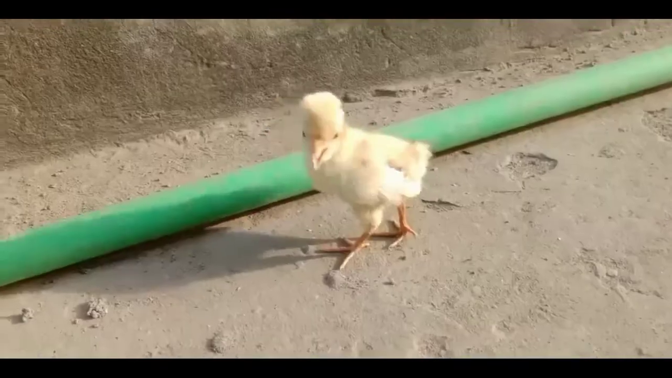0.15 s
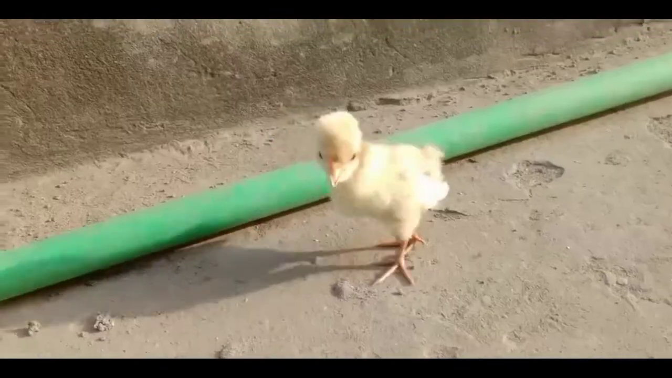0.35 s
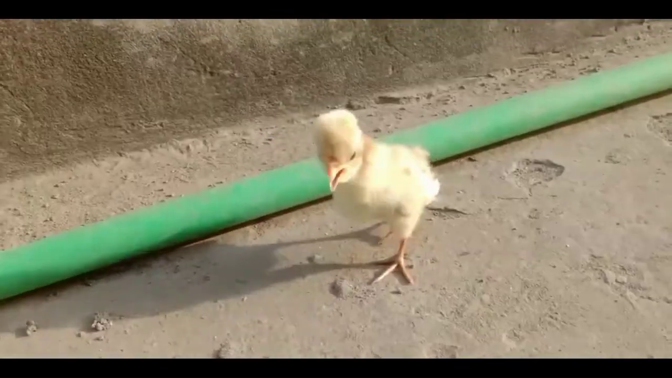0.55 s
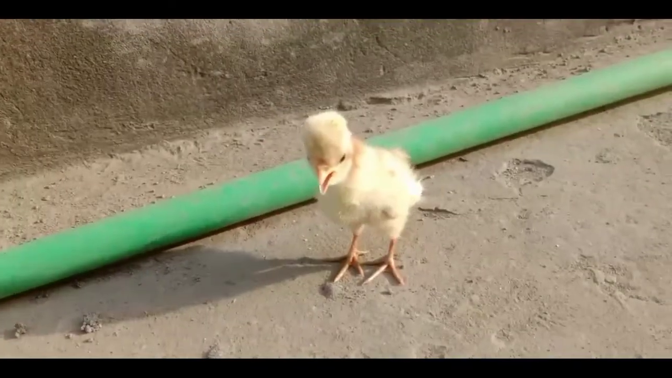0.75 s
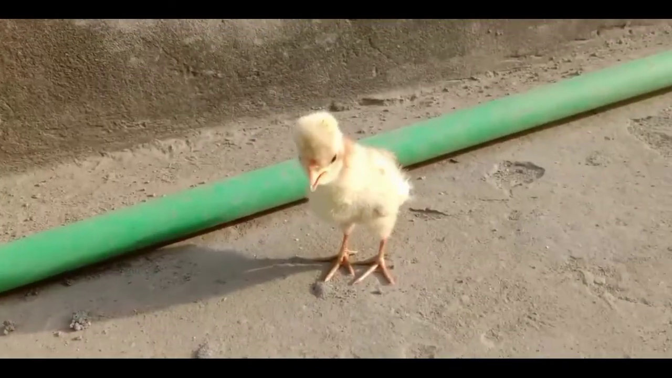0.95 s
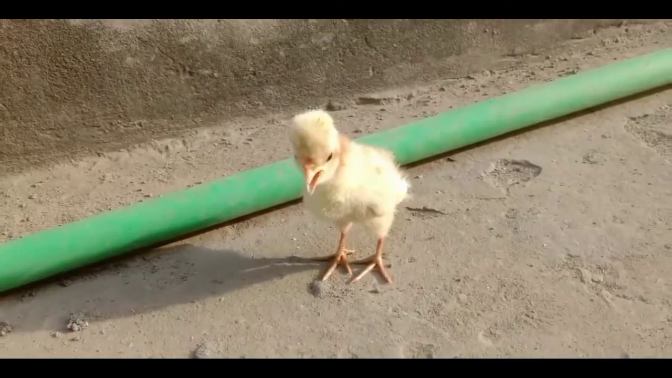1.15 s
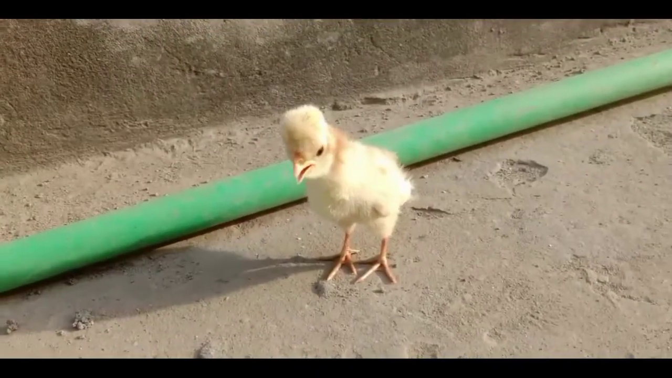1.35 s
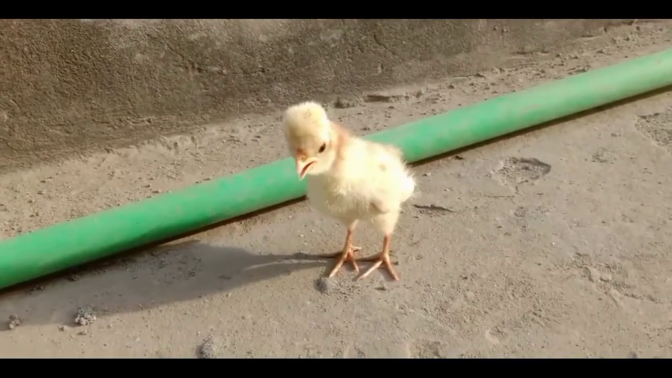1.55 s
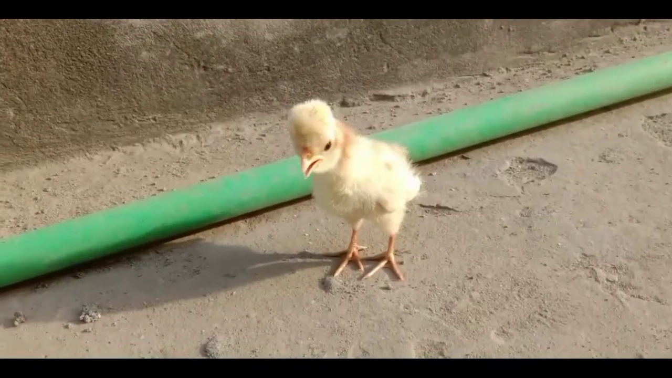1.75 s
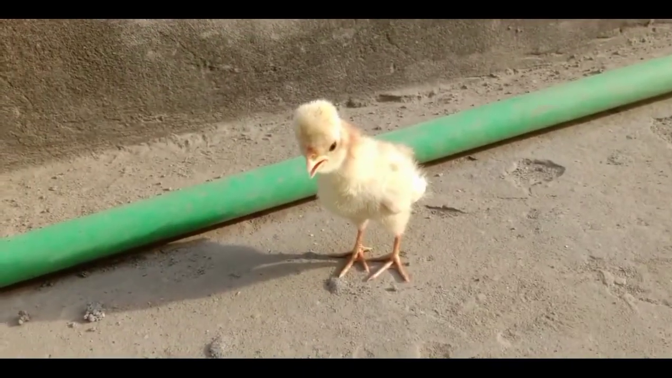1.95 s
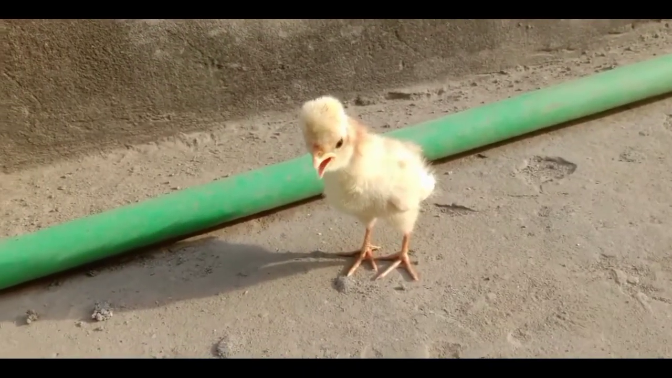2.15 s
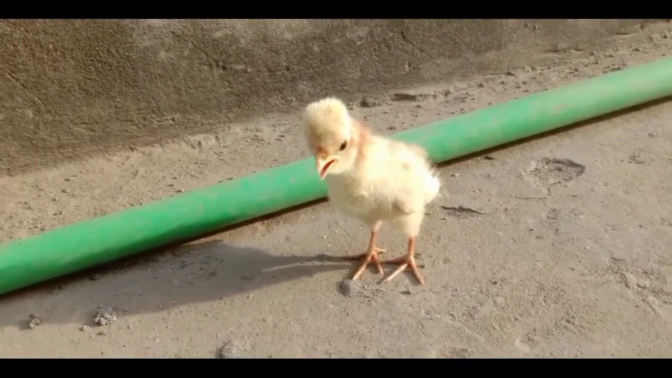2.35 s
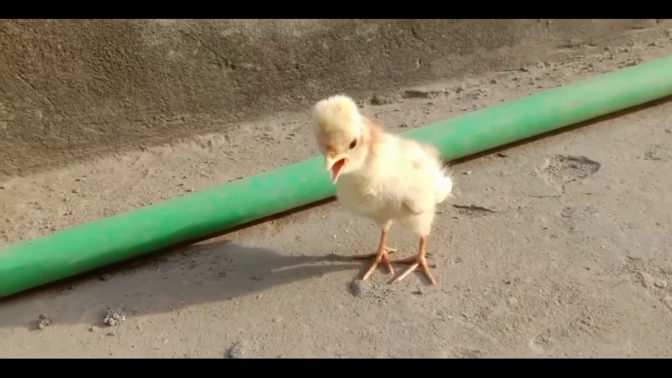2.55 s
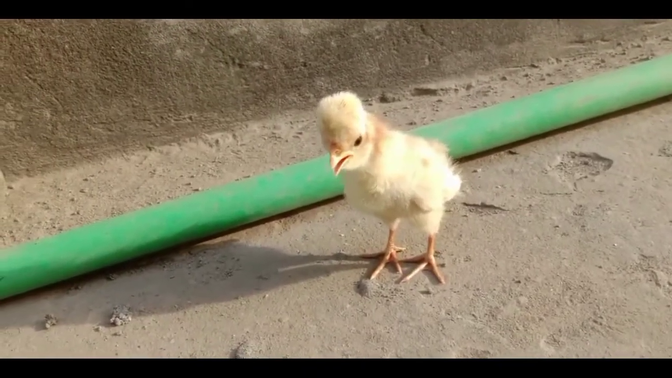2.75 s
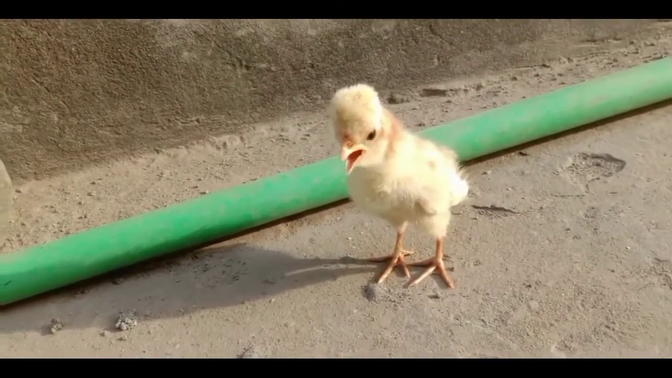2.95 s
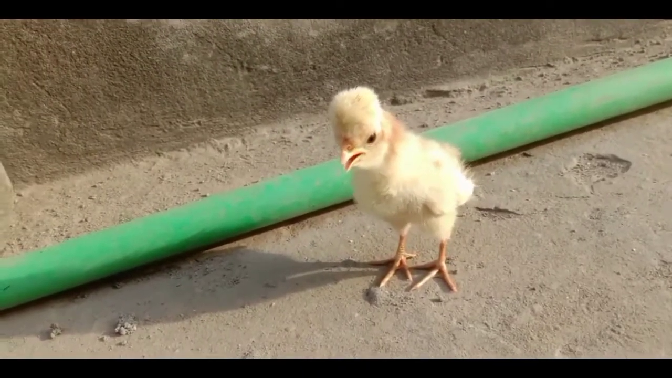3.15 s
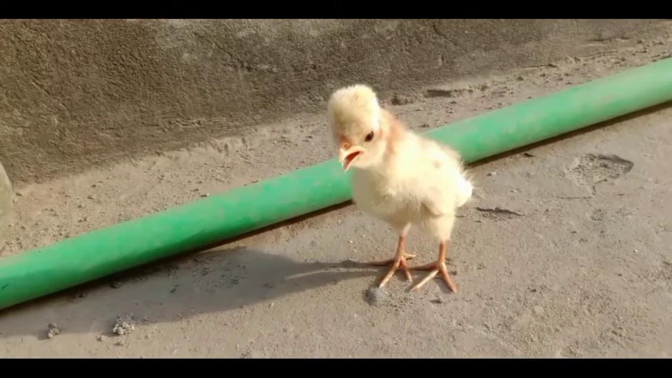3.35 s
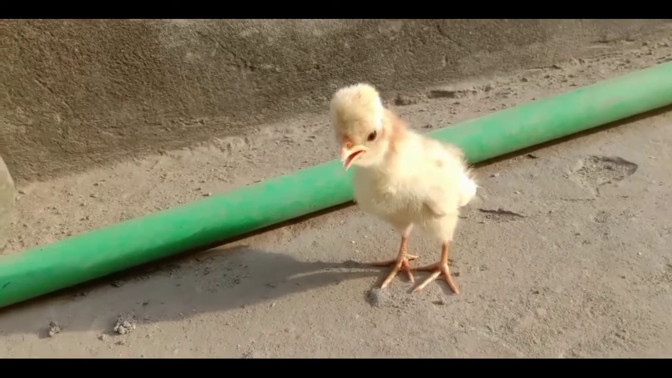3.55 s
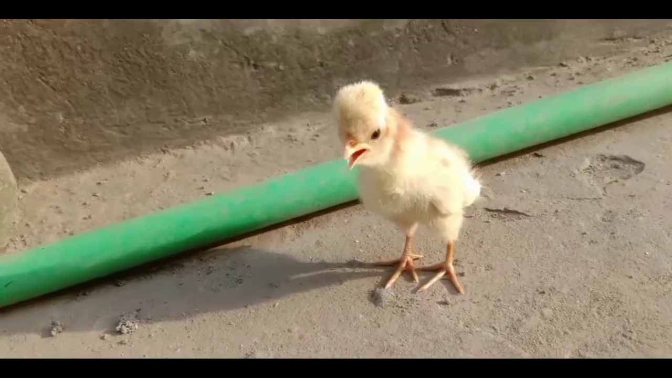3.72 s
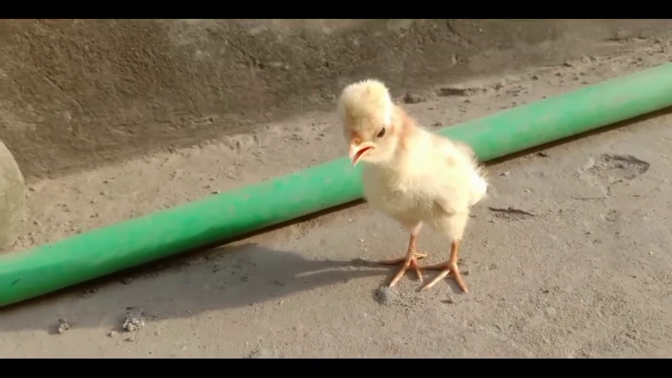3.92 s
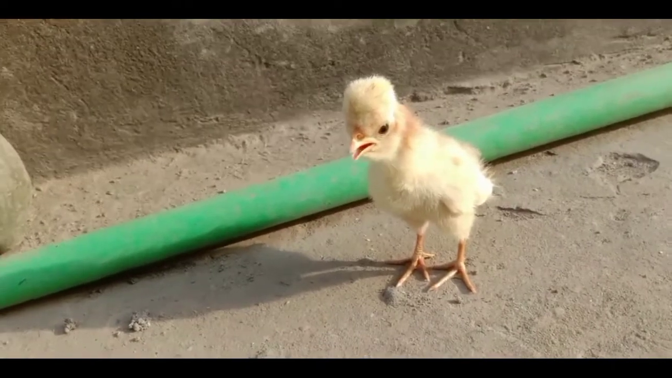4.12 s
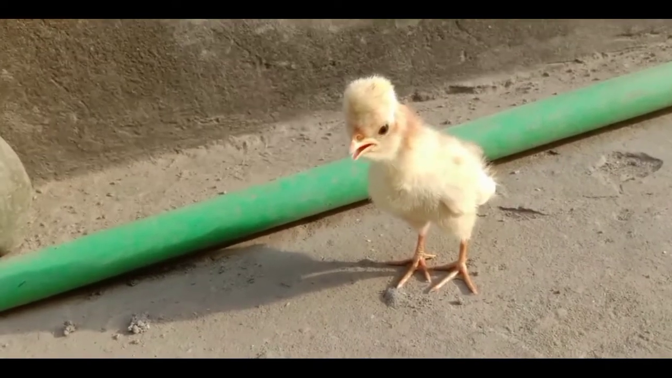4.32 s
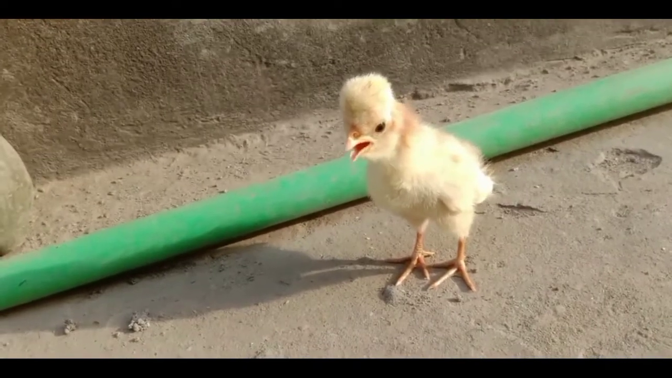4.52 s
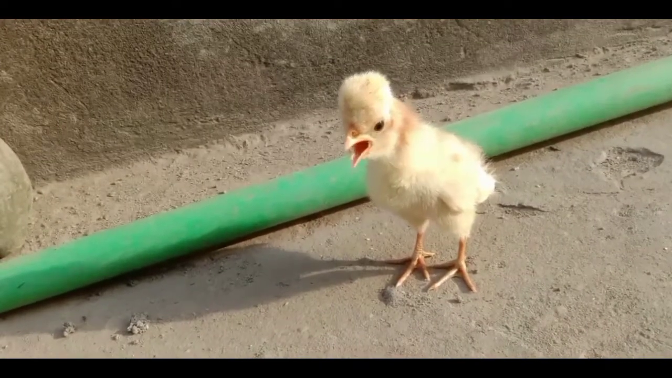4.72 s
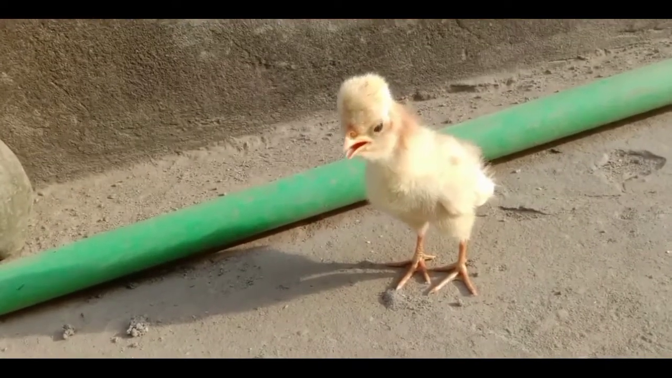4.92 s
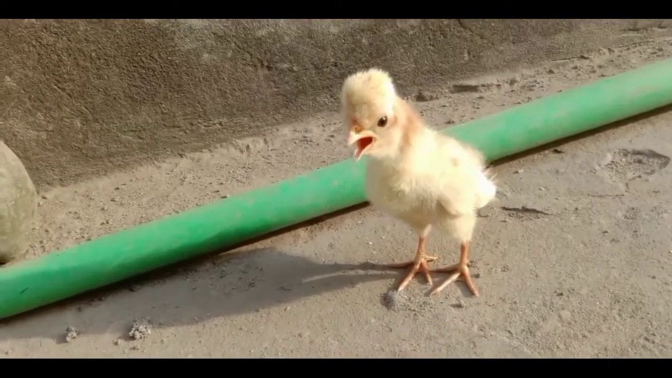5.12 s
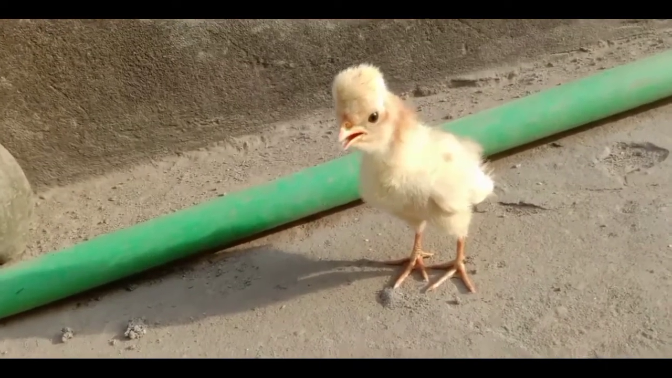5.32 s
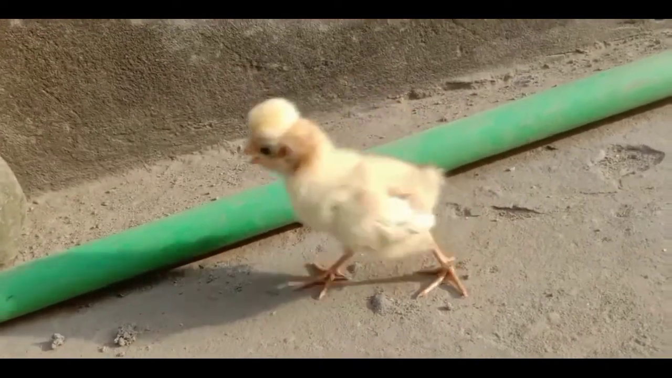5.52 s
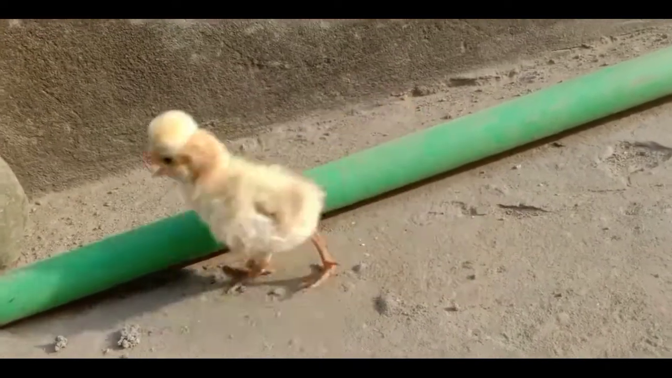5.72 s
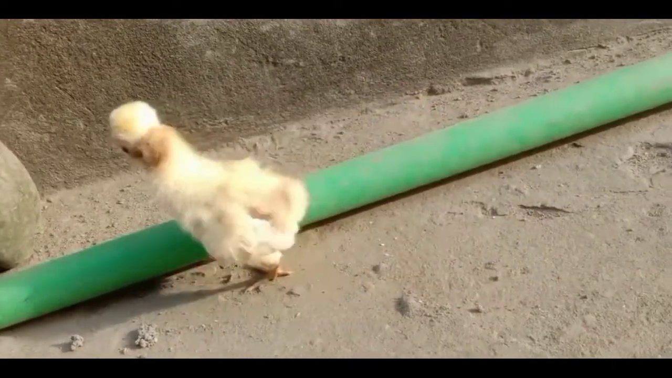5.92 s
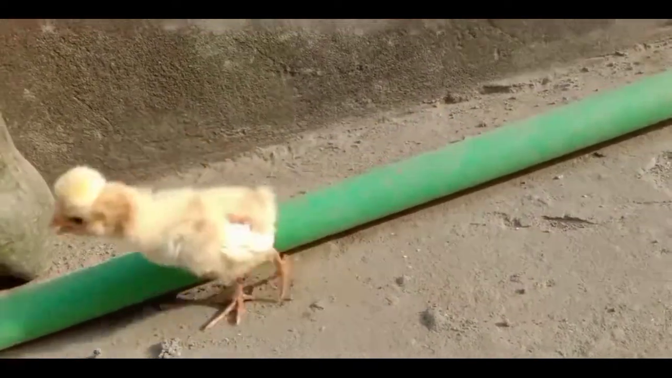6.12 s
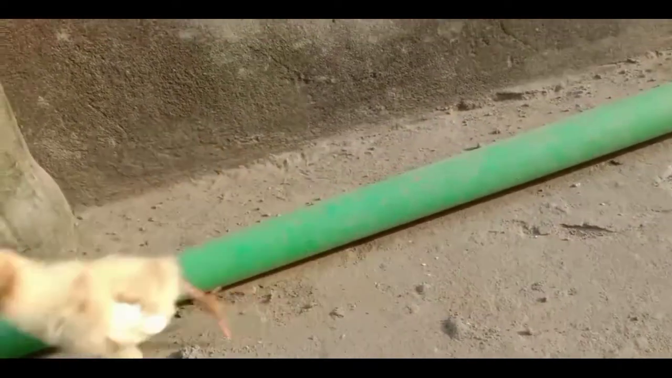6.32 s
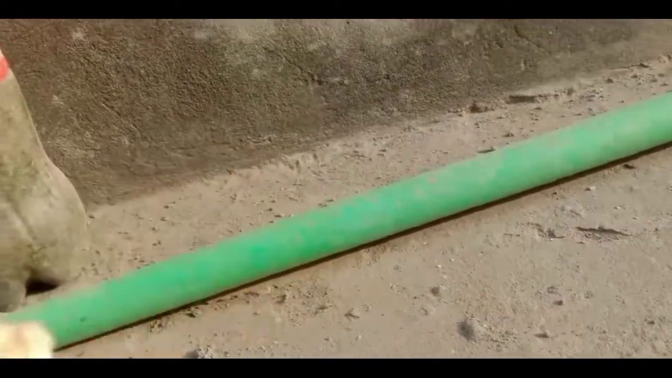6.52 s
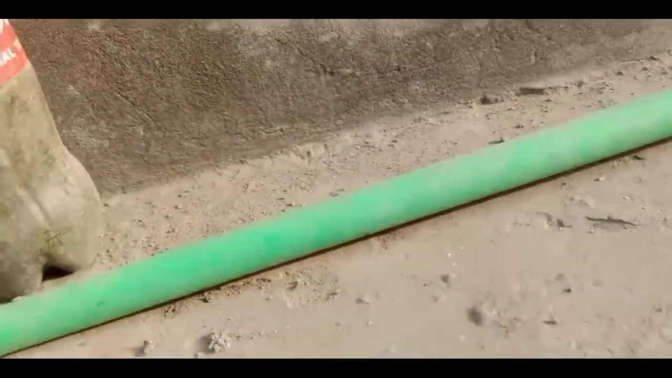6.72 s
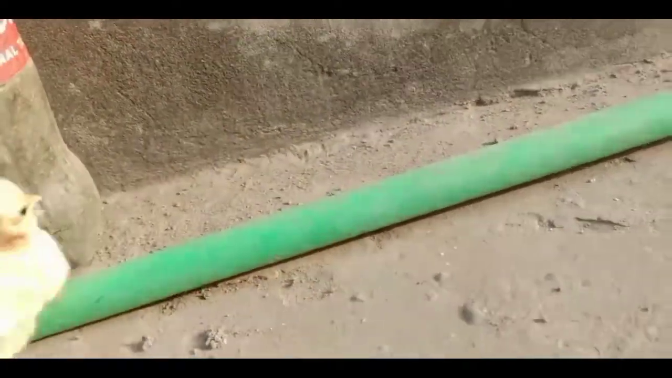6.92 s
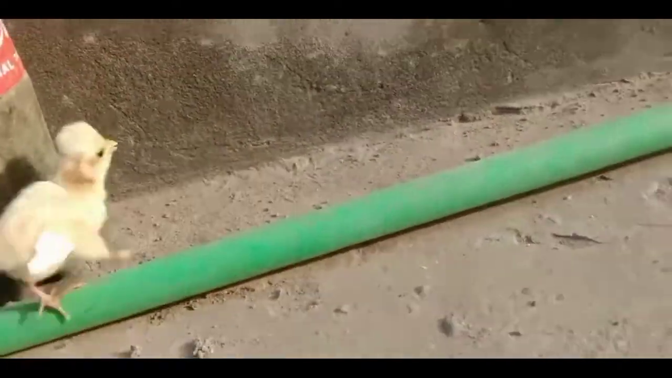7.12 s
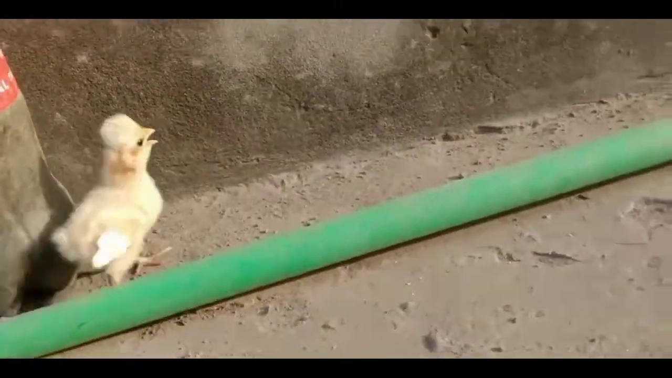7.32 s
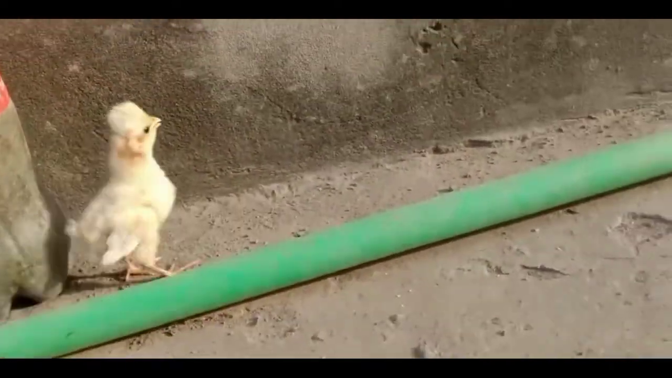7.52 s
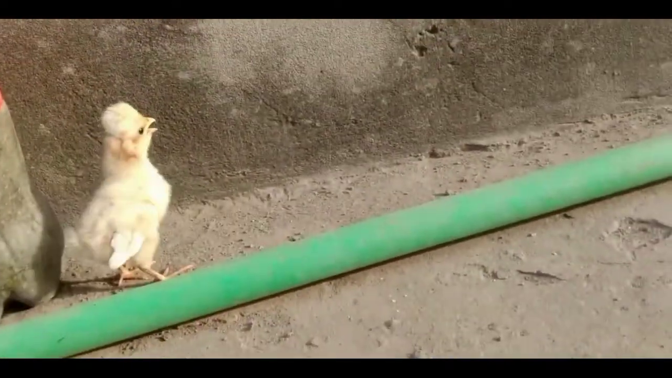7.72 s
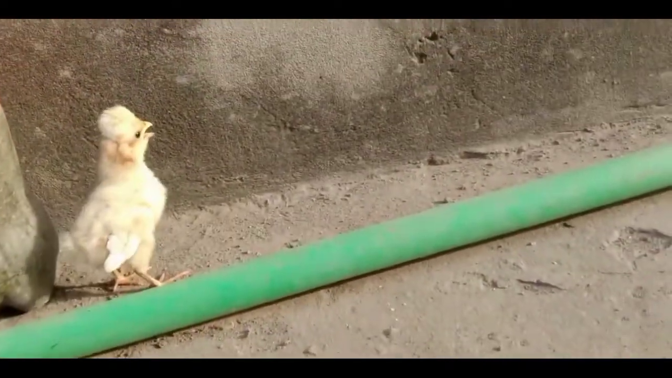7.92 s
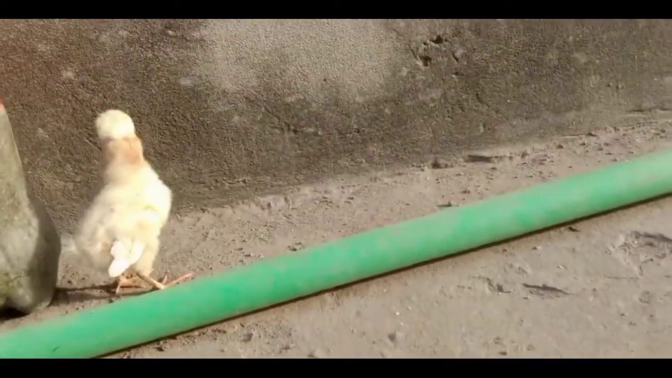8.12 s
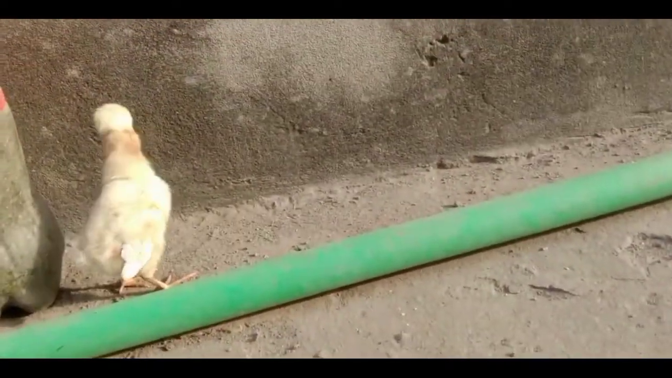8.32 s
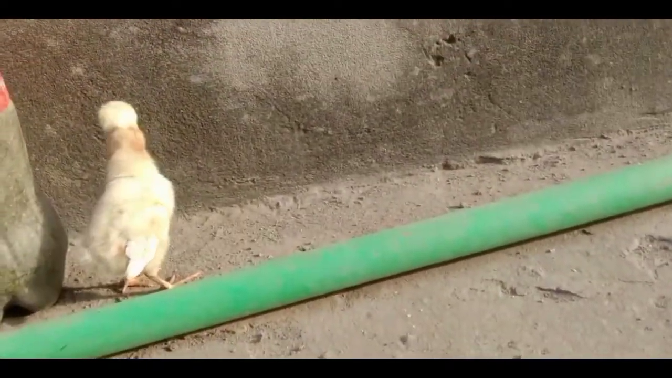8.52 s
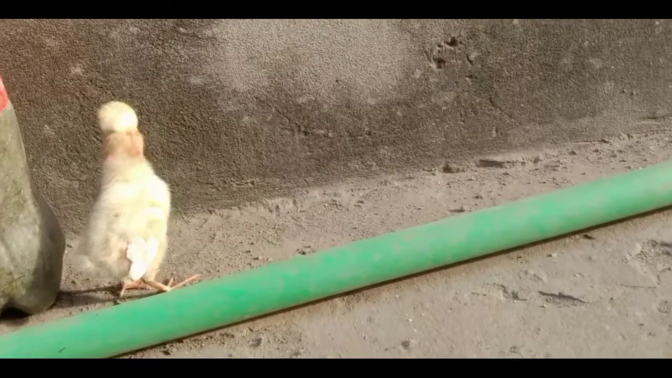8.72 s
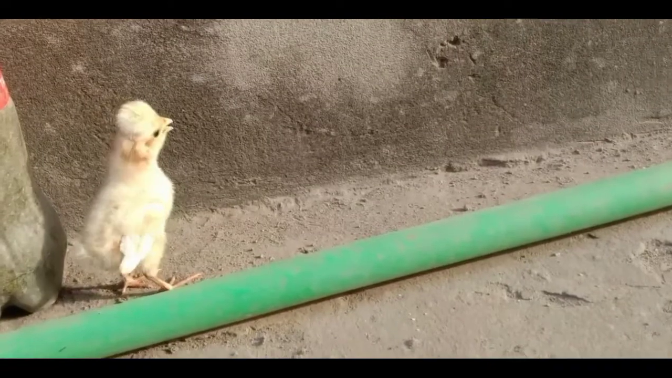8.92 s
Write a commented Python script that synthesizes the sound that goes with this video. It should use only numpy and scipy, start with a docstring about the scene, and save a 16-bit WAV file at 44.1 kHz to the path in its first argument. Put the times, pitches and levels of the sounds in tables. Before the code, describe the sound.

A chick peeps loudly and steadily about three times a second over softer cheeps of its brood, with small knocks and ticks in a yard.

```python
"""On a concrete yard beside a wall a chick peeps loudly, about three times a second, over its brood.
Each peep steps down through three registers of the syrinx, a near sine coloured by throat and beak;
the brood's softer cheeps arch, then slide down. Knocks, likely pecks and steps, are struck modes; ticks are
noise bursts, and a few far-off clucks are harmonic tones. Filtered noise and a wavering sine make a faint
outdoor rumble and hum. The wall reflects the birds and contacts; the sound drops out once, early on."""
import sys
import numpy as np
from scipy import signal
from scipy.fft import rfft, irfft
from scipy.io import wavfile
from scipy.ndimage import uniform_filter1d, minimum_filter1d

SR = 44100
rng = np.random.default_rng(int(sys.argv[2]) if len(sys.argv) > 2 else 0)


def to_wav(sig):
    """Store sig (one row per channel, or 1-D mono) as 16-bit WAV at the path in sys.argv[1].

    Samples outside -1..1 are clipped; the rate is SR.
    """
    pcm = np.clip(np.atleast_2d(sig), -1, 1) * 32767
    pcm = np.round(pcm).astype(np.int16)
    wavfile.write(sys.argv[1], SR, pcm.T)  # frames by channels


N = 395136
TIME = np.arange(N) / SR
CUTOFF_HZ = 15850   # upper limit of the whole sound


def from_db(db):
    """Logarithmic level: decibels become an amplitude ratio."""
    return 10 ** (np.asarray(db) / 20)


def rms_one(x):
    """Normalisation: the signal is scaled to unit rms."""
    return x / np.sqrt(np.mean(x ** 2) + 1e-20)


def at_hz(points, hz):
    """Spectral envelope: levels are interpolated along a log-frequency axis."""
    freqs, values = np.transpose(points)
    return np.interp(np.log(hz + 1), np.log(freqs), values)


def band(x, hz, kind, order=2):
    """Linear filtering: a Butterworth response, maximally flat in its passband."""
    sections = signal.butter(order, hz, kind, fs=SR, output="sos")
    return signal.sosfilt(sections, x + 1e-18)


def drift(rate_hz):
    """Random modulation: low-passed noise wanders with unit rms."""
    noise = rng.standard_normal(N + SR)
    return rms_one(band(noise, rate_hz, "low")[SR:])   # the filter's first second is discarded


# outdoor spectrum before normalisation: (frequency [Hz], relative density [dB per Hz])
AIR_SPECTRUM = [(25, -40.5), (50, -15.5), (75, -5), (120, 6), (170, -1), (270, -8), (450, -6.5), (750, -9),
                (1400, -9.5), (2000, -21.5), (3300, -18), (4500, -24.5), (6500, -23), (7800, -48),
                (13000, -43), (15200, -29)]
# course of the outdoor noise, before the offset air_db: (time [s], level [dB])
AIR_COURSE = [(0, -45), (.3, -61), (.8, -48.5), (1.4, -52), (2.3, -48), (3.1, -53), (4.1, -52), (4.7, -50),
              (5.6, -52), (6.25, -51), (7.5, -52.5), (8.25, -46.5), (8.96, -51.5)]
HUM_HZ, HUM_DB = 115, -54.5   # centres of the hum's wavering pitch and level


def outdoors(air_db=5.5, lumpy_db=2.2, patchy_db=5.0, count=18):
    """Spectral shaping: noise forms rumble and hiss, its middle bands swell separately, and a sine hums."""
    hz = np.arange(N // 2 + 1) * SR / N
    spectrum = rfft(rng.standard_normal(N)) * from_db(at_hz(AIR_SPECTRUM, hz))
    edges = np.geomspace(150, 1900, count)   # Hz
    air = irfft(spectrum * ((hz < edges[0]) | (hz >= edges[-1])), N)
    for low, high in zip(edges, edges[1:]):
        one_band = irfft(spectrum * ((hz >= low) & (hz < high)), N)
        air += one_band * from_db(patchy_db * drift(7.2) - 2.5)
    level = np.interp(TIME, *np.transpose(AIR_COURSE)) + air_db + lumpy_db * drift(25.6)
    hum_hz = HUM_HZ * (1 + .03 * drift(7.3))
    hum = np.sin(2 * np.pi * np.cumsum(hum_hz) / SR)
    return from_db(level) * rms_one(air) + from_db(HUM_DB + 3 * drift(6.1)) * hum


def stages(marks):
    """Piecewise time warping: gives a call's samples and its stage, which counts up by one at each mark."""
    at = np.flatnonzero((TIME > marks[0]) & (TIME < marks[-1]))
    return at, np.interp(TIME[at], marks, np.arange(len(marks)))


# vocal-tract colouring of the overtones: (frequency [Hz], relative level [dB])
THROAT_RESPONSE = [(5000, 2), (6700, -1.5), (7200, -12.5), (7900, -18), (8800, -32.5), (9600, -20),
                   (10200, -17), (11000, -22.5), (12200, -8.5), (13600, -18), (15500, -20)]


def syrinx(hz, tone_db, overtone_db, rolloff_db):
    """Source and filter: a near sine carries four overtones that the throat colours, with soft ends."""
    phase = 2 * np.pi * np.cumsum(hz) / SR
    out = from_db(tone_db) * np.sin(phase)
    for k in range(2, 6):
        in_range = np.clip((CUTOFF_HZ - k * hz) / 500, 0, 1)   # fades out below the cutoff
        level = overtone_db + at_hz(THROAT_RESPONSE, k * hz) + rolloff_db * (k - 2)
        out += from_db(level) * np.sin(k * phase) * in_range
    return out * signal.windows.tukey(len(out), .04)


# loud peeps, nominal values:
# (start [s], length of opening [s], whistle pitch [Hz], whistle level [dB], thinness [dB])
LOUD_PEEPS = [(-.018, 0.085, 4720, -6, -7.5), (0.411, 0.046, 4860, -13.5, 0),
              (0.727, 0.041, 4650, -11, 1.5), (1.126, 0.045, 4670, -10.5, 3), (2.155, .026, 4570, -12, -3),
              (2.497, .045, 4635, -13, 0.5), (2.847, 0.052, 4684, -13, 1), (3.201, 0.044, 4645, -12.5, -1),
              (3.57, 0.042, 4630, -13, 0), (3.94, 0.047, 4640, -12.5, 0.5), (4.352, 0.033, 4640, -11.5, -1),
              (4.679, 0.047, 4620, -11, 3), (5.013, 0.051, 4625, -11.5, 1), (5.363, 0.066, 4744, -12, 5),
              (5.659, 0.057, 4820, -12, 2.5), (5.979, 0.058, 4725, -12.5, 7),
              (6.278, .053, 4720, -13.5, -1), (6.593, 0.053, 4585, -14, 2), (6.895, 0.05, 4750, -13.5, 3),
              (7.204, 0.074, 4640, -12, 5.5), (7.581, 0.061, 4660, -12.5, 4.5),
              (7.919, .053, 4700, -12.5, 5.5), (8.261, 0.051, 4680, -14, 6), (8.624, .05, 4706, -13.5, 6)]
# pitch contours; stage 0 is the start, 1 the step to the whistle, 2 the break, 3 the end
# opening and whistle: (stage [1], pitch over the whistle pitch [1])
HIGH_CONTOUR = [(0, 1.24), (0.148, 1.38), (0.299, 1.42), (.6, 1.31), (.85, 1.235), (0.972, 1.15),
                (1.071, 1.06), (1.3, 1.02), (1.6, .995), (1.902, .965)]
# low note and slide: (stage [1], pitch over LOW_NOTE_HZ [1])
LOW_CONTOUR = [(2.039, 1.005), (2.201, 1.003), (2.4, .988), (2.551, .958), (2.702, .88), (2.852, .765),
               (3, .615)]
LOW_NOTE_HZ = 3382
PEEP_S, WHISTLE_S = 0.14, .025   # all peeps are equally long: a longer opening leaves a shorter low note
# against the whistle: opening, low note, its octave, octave of the slide
OPENING_DB, LOW_DB, OCTAVE_DB, SLIDE_DB = -11.5, -7.5, -15.5, -8.5
# a thin peep has a weaker low note; opening and octave gain these shares of what it loses
OPENING_GAINS, OCTAVE_GAINS = 0.61, 0.26


def chick(rasp=.009, jitter=0.0025, flutter_db=3.0, tone_db=.5, overtone_db=0.0,
          twin_ratio=.915, twin_db=-12.0, wander=0.0097):
    """Register breaks: a two-voiced high opening, a pure loud whistle, then a reedy low note slides away."""
    out, shake, flutter, reed = np.zeros(N), drift(680), drift(90), drift(160)
    bend = 1 + wander * drift(18)   # no two peeps bend quite alike
    for start, opening_s, whistle_hz, whistle, thin in LOUD_PEEPS:
        at, stage = stages(start + np.array([0, opening_s, opening_s + WHISTLE_S, PEEP_S]))

        # levels of the registers, dB
        high = whistle + OPENING_DB + OPENING_GAINS * thin
        low = whistle + LOW_DB - thin
        octave = whistle + OCTAVE_DB + OCTAVE_GAINS * thin
        slide = whistle + SLIDE_DB

        # pitch, roughest in the middle of the opening
        contour = [(s, r * whistle_hz) for s, r in HIGH_CONTOUR]
        contour += [(s, r * LOW_NOTE_HZ) for s, r in LOW_CONTOUR]
        unsteady = np.interp(stage, [.25, .45, .8, 1], [jitter, rasp, rasp, jitter])
        hz = np.interp(stage, *np.transpose(contour)) * bend[at] * (1 + unsteady * shake[at])

        # levels of the fundamental and the overtones, dB
        tone = np.interp(stage, [0, .2, .5, .75, .94, 1.03, 1.6, 1.9, 2.04, 2.45, 2.7, 3],
                         [high - 19, high - 6, high - 3, high + 2, high - 1, whistle,
                          whistle + 2.5, whistle, low, low + 1, low - 10, low - 34])
        over = np.interp(stage, [0, .3, .9, 1.1, 1.92, 2.03, 2.45, 2.62, 2.9, 3],
                         [high - 32, high - 12, high - 16, whistle - 25, whistle - 26,
                          octave, octave, slide, slide + 1, slide - 16])
        # the low note is reedy, the slide smooth
        rolloff = np.interp(stage, [1.9, 2.1, 2.5, 2.8], [-3, -3.5, -4.5, -17])
        waver = flutter_db * np.interp(stage, [2, 2.1, 2.3, 2.6], [0.98, 0.44, .4, 1])
        tone_level = tone + tone_db + waver * flutter[at]
        over_level = over + overtone_db + waver * reed[at]
        out[at] += syrinx(hz, tone_level, over_level, rolloff)

        # in the opening the two sides of the syrinx split apart and beat against each other
        split = np.interp(stage, [.25, .45, .75, .95], [0, 1, 1, 0])
        twin_hz = hz * twin_ratio * (1 + 0.028 * rng.standard_normal())
        twin = tone + twin_db + flutter_db * reed[at]
        out[at] += split * syrinx(twin_hz, twin, twin - 14, rolloff)
    return out


ANSWER_S, ANSWER_SPREAD_S = .08, .04   # far chicks' arches break about this long after a loud peep starts
FAINT_ARCH_DB, FAINT_SLIDE_DB = -37.5, -37   # central levels
USUAL_CHEEP_HZ = 4500


def faint_cheeps(spread=0.12, spread_db=3.5):
    """Random variation: the farthest chicks join each loud peep at a chance time, pitch and level."""
    draws = np.clip(rng.standard_normal((len(LOUD_PEEPS), 3)), -1.5, 1.5)
    cheeps = []
    for (start, *_), (late, pitch, size) in zip(LOUD_PEEPS, draws):
        break_s = start + ANSWER_S + ANSWER_SPREAD_S * late
        top_hz = USUAL_CHEEP_HZ * np.exp(spread * pitch)
        cheeps.append((break_s, top_hz, FAINT_ARCH_DB + spread_db * size, FAINT_SLIDE_DB + spread_db * size))
    return cheeps


# clear cheeps of the brood, nominal levels:
# (time of the break [s], top of the arch [Hz], arch level [dB], slide level [dB])
CLEAR_CHEEPS = [(0.024, 5000, -19.5, -30), (0.196, 4030, -42, -44.5), (0.329, 5170, -25, -29),
                (0.41, 4370, -30, -24.5), (0.665, 5220, -28, -22), (0.763, 5030, -27.5, -32),
                (0.969, 4170, -39, -37), (1.02, 5020, -33, -18.5), (1.082, 5270, -25.5, -22.5),
                (1.094, 5070, -39, -23.5), (1.31, 4780, -35.5, -18.5), (1.356, 4400, -36, -28),
                (1.393, 5140, -21.5, -17.5), (1.443, 4570, -17, -24.5), (1.617, 4840, -34, -19.5),
                (1.695, 4100, -61, -27.5), (1.919, 3930, -38, -41.5), (1.974, 4770, -32.5, -21.5),
                (2.278, 4180, -32, -29), (2.426, 4500, -39.5, -24.5), (2.691, 4400, -32, -26.5),
                (2.734, 4900, -37.5, -25.5), (2.999, 4730, -38, -25.5), (3.103, 4650, -35.5, -24),
                (3.164, 3920, -35.5, -37.5), (3.383, 4720, -29, -22), (3.53, 4434, -30, -28),
                (3.553, 2740, -36, -40.5), (3.749, 4900, -35, -25), (3.825, 3450, -33, -28),
                (3.929, 4990, -26, -21), (3.934, 3660, -24.5, -28), (4.146, 3840, -46, -43),
                (4.3, 4910, -27, -21), (4.557, 5150, -27.5, -21), (4.59, 4430, -41, -32.5),
                (4.891, 5180, -29, -21.5), (5.171, 4560, -32.5, -22.5), (5.211, 4180, -31, -29),
                (5.24, 5100, -26, -22.5), (5.4, 4210, -35, -31.5), (5.491, 4700, -25, -27.5),
                (5.534, 4860, -28, -24), (5.59, 4920, -36, -25), (5.655, 4160, -32, -29.5),
                (5.848, 4995, -15.5, -20), (6.284, 2780, -31, -30), (6.29, 4570, -28, -21),
                (6.475, 4660, -36.5, -46.5), (6.524, 3470, -42, -29), (6.613, 4870, -32, -24),
                (6.855, 5070, -31.5, -22.5), (7.146, 4850, -39.5, -27.5), (7.421, 2860, -48, -29),
                (7.795, 3800, -37, -46), (7.922, 4420, -30.5, -28), (8.153, 2905, -35, -27.5),
                (8.27, 4150, -35, -35), (8.316, 4300, -23.5, -32.5), (8.377, 3455, -37, -25),
                (8.48, 4460, -29, -21.5), (8.697, 4730, -38, -27), (8.897, 4475, -18, -23.5),
                (8.939, 5010, -23, -20)]
# pitch sets the shape, higher ones arch longer and slide faster: value at the usual pitch, power of the ratio
ARCH_S, ARCH_POWER = .044, 2.8
SLIDE_S, SLIDE_POWER = .035, -0.69
SLIDE_FROM_HZ, FROM_POWER = 3550, .5
SLIDE_TO_HZ, TO_POWER = 2553, .25
# share of the way down to the slide at which the arch breaks; the slide's octave against the slide
ARCH_SAG, CHEEP_OCTAVE_DB = .58, -5


def brood(jitter=.005, flutter_db=2.5, tone_db=-0.5, overtone_db=-4.0):
    """Frequency glide: a pure arch breaks into a quick downward slide with a strong octave."""
    out, shake, flutter, reed = np.zeros(N), drift(500), drift(120), drift(140)
    for break_s, top_hz, arch, slide in CLEAR_CHEEPS + faint_cheeps():
        ratio = top_hz / USUAL_CHEEP_HZ
        start = break_s - ARCH_S * ratio ** ARCH_POWER
        end = break_s + SLIDE_S * ratio ** SLIDE_POWER
        at, stage = stages([start, break_s, end])

        slide_hz = SLIDE_FROM_HZ * ratio ** FROM_POWER
        end_hz = SLIDE_TO_HZ * ratio ** TO_POWER
        bend_hz = top_hz + ARCH_SAG * (slide_hz - top_hz)
        hz = np.interp(stage, [0, .2, .45, .7, .93, 1.05, 1.55, 2],
                       [.92 * top_hz, .985 * top_hz, top_hz, top_hz + 0.34 * (bend_hz - top_hz), bend_hz,
                        slide_hz, slide_hz + 0.411 * (end_hz - slide_hz), end_hz])

        octave = slide + CHEEP_OCTAVE_DB
        tone = np.interp(stage, [0, .25, .7, .95, 1.15, 1.55, 1.85, 2],
                         [arch - 18, arch - 2, arch + 1, arch, slide + 1, slide + 1, slide - 4, slide - 17])
        over = np.interp(stage, [0, .3, .92, 1.08, 1.5, 1.85, 2],
                         [arch - 30, arch - 17, arch - 14, octave, octave + 2, octave - 1, octave - 13])
        tone_level = tone + tone_db + flutter_db * flutter[at]
        over_level = over + overtone_db + flutter_db * reed[at]
        out[at] += syrinx(hz * (1 + jitter * shake[at]), tone_level, over_level, rolloff_db=-17.0)
    return out


def ticks(per_s=11.0, level_db=-38.5, spread_db=7.0, decay_s=0.0056):
    """Poisson-like process: faint ticks of grit come at random as decaying bursts of noise."""
    sizes = from_db(level_db + spread_db * np.clip(rng.standard_normal(N), -2, 2))
    born = (rng.random(N) < per_s / SR) * sizes
    envelope = signal.lfilter([1], [1, -np.exp(-1 / (decay_s * SR))], born + 1e-18)
    return band(envelope * rng.standard_normal(N), [500, 4000], "band", order=4)


def ring(clicks, hz, t60):
    """Damped resonance: a unit click sets a sine ringing, 60 dB weaker after t60 seconds."""
    r, w = from_db(-60 / (t60 * SR)), 2 * np.pi * hz / SR   # pole radius and angle
    return signal.lfilter([0, np.sin(w)], [1, -2 * r * np.cos(w), r * r], clicks + 1e-18)


# contacts, nominal levels: (time [s], level [dB], click over body [dB])
CONTACTS = [(.814, -22.5, -5), (.983, -40.5, 3), (1.608, -39, -2), (1.871, -36.5, 5), (2.14, -46, 10),
            (2.285, -26.5, -0.5), (2.368, -35, -5), (2.417, -30, -2), (2.422, -33, 6), (3.066, -44, 14.5),
            (3.916, -26, -3), (4.732, -35, 7), (5.541, -39, 8), (5.779, -33.5, -6), (5.83, -30, -3),
            (6.136, -35, -5), (6.352, -32.5, -6), (6.795, -38, 9.5), (7.159, -35, -8.5), (7.847, -22.5, 3),
            (7.887, -33.5, 3.5), (8.274, -37.5, 7.5), (8.569, -34, 14)]
# resonances of the body: (frequency [Hz], relative level [dB], t60 [s])
BODY_RESONANCES = [(425, -12, 0.081), (570, -7, .05), (721, -1.5, 0.052), (950, 0, 0.016)]
# resonances of the click: (frequency [Hz], relative level [dB], t60 [s])
CLICK_RESONANCES = [(1075, -2.5, 0.024), (1328, 2, 0.012), (1464, 3.5, 0.011), (1944, -12.5, 0.013),
                    (2400, -7, 0.03), (4600, -14, .008)]


def knocks(body_db=2.5, click_db=4.5, blow_db=-1.5, grit=0.11, grit_s=0.0042):
    """Modal excitation: a click and a short gritty scuff strike every mode with a strength of their own."""
    out = np.zeros(N)
    seconds, strength, hardness = np.transpose(CONTACTS)
    at = (seconds * SR).astype(int)
    body = strength - hardness / 2 + body_db
    click = strength + hardness / 2 + click_db
    for modes, level in ((BODY_RESONANCES, body), (CLICK_RESONANCES, click)):
        for hz, mode_db, t60 in modes:
            chance_db = rng.normal(0, 3.8, len(level))
            blows = np.zeros(N)
            blows[at] = from_db(level + mode_db + chance_db) * rng.choice([-1, 1], len(level))
            scuff_envelope = signal.lfilter([grit], [1, -np.exp(-1 / (grit_s * SR))], abs(blows) + 1e-18)
            scuff = scuff_envelope * rng.standard_normal(N)
            out += ring(blows * from_db(blow_db) + scuff, hz, t60)
    return band(out, [380, 3600], "band")   # small, blunt contacts have neither bass nor top


# faint far-off notes, perhaps a hen: (start [s], length [s], central pitch [Hz], level [dB])
FAR_CLUCKS = [(6.08, 0.28, 435, -52), (6.36, 0.26, 413, -61.5), (8.07, 0.11, 410, -53),
              (8.224, 0.085, 400, -47.5), (8.433, 0.037, 433, -48), (8.895, 0.23, 393, -42)]
# harmonics 1 to 3 against the level of the note: (level [dB])
HEN_HARMONICS = [2.5, 4, -8]


def hen(waver=.015, sag=0.067):
    """Harmonic series: three harmonics form soft, slightly wavering notes that sag in pitch."""
    out, shake = np.zeros(N), drift(40)
    for start, length, hz, level_db in FAR_CLUCKS:
        at, stage = stages([start, start + length])
        bent_hz = hz * (1 + waver * shake[at] - sag * (stage - .5))
        phase = 2 * np.pi * np.cumsum(bent_hz) / SR
        note = sum(from_db(level_db + db) * np.sin(k * phase) for k, db in enumerate(HEN_HARMONICS, 1))
        out[at] += note * np.sin(np.pi * stage)   # swells and fades
    return out


def yard(x, wall_s, wall_db, early_db, late_db, early_t60=0.13, late_t60=0.38, dull_hz=7000, sway_s=.00006):
    """Reflection and reverberation: the wall answers along a path that shifts; scattered echoes die away."""
    age = TIME[:SR * 3 // 4]
    echoes = np.zeros(len(age))
    for level_db, t60 in ((early_db, early_t60), (late_db, late_t60)):
        tail = rng.standard_normal(len(age)) * from_db(-60 * age / t60) * (age > wall_s)
        echoes += from_db(level_db) * tail / np.linalg.norm(tail)
    echoes = band(echoes, min(dull_hz, CUTOFF_HZ), "low", order=4)
    delay_s = wall_s + sway_s * drift(1.36)   # shifts as the birds move
    wall = from_db(wall_db) * np.interp(TIME - delay_s, TIME, x)
    return x + wall + signal.fftconvolve(x, echoes)[:N]


def scene():
    """Superposition: the near chick is the driest; the brood and the knocks are farther off."""
    near = yard(chick(), wall_s=.0031, wall_db=-11.0, early_db=-17.5, late_db=-18.0)
    far_sources = brood() + hen() + knocks() + ticks()
    far = yard(far_sources, wall_s=.0024, wall_db=-13.5, early_db=-10.0, late_db=-24.5)
    return (near + far + outdoors())[None]


def limiter(x, ceiling=.46, size=130):
    """Peak limiting: the gain dips just ahead of any peak that would pass the ceiling."""
    gain = minimum_filter1d(ceiling / np.maximum(abs(x), ceiling), size=2 * size)
    return x * uniform_filter1d(gain, size=size)


# interval in which the sound drops out: (from [s], to [s])
DROPOUT = (0.067, 0.1986)


def record(dry, split_hz=2300, threshold_db=-22.5, depth=1.47, release_db_per_s=171.0):
    """Level-dependent gain: loud peeps duck the low range; peaks are limited, a gap muted, the top cut."""
    x = dry[0]
    low = signal.sosfiltfilt(signal.butter(4, split_hz, fs=SR, output="sos"), x)
    high = x - low
    loudness = 10 * np.log10(np.maximum(uniform_filter1d(high ** 2, size=220), 1e-12))
    # the level rises at once and falls no faster than the release
    held = np.maximum.accumulate(loudness + release_db_per_s * TIME) - release_db_per_s * TIME
    duck = from_db(-depth * uniform_filter1d(np.maximum(held - threshold_db, 0), size=180))
    sounding = uniform_filter1d(1.0 * ((TIME < DROPOUT[0]) | (TIME > DROPOUT[1])), size=130)
    out = limiter(high + duck * low) * sounding
    return signal.sosfilt(signal.ellip(10, .2, 80, CUTOFF_HZ, fs=SR, output="sos"), out)[None]


dry = scene()
out = record(dry)
to_wav(out)
```